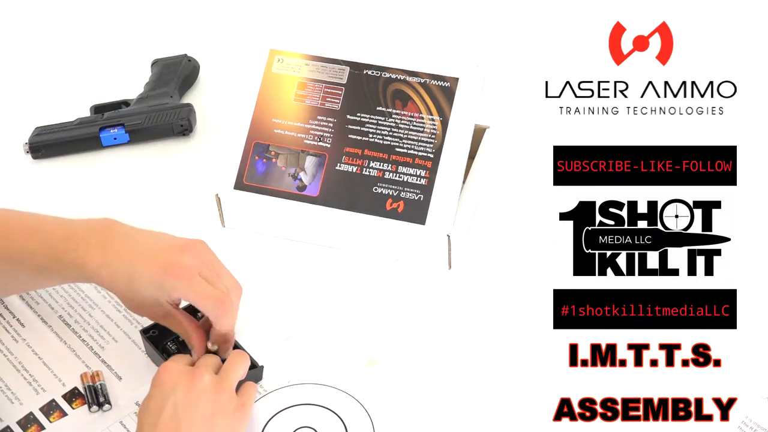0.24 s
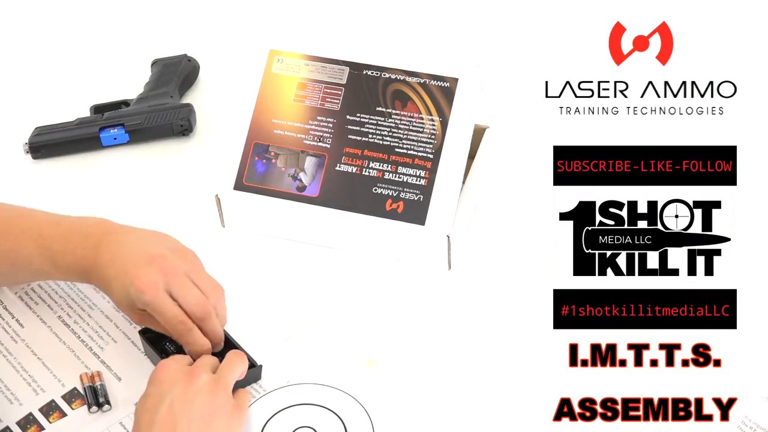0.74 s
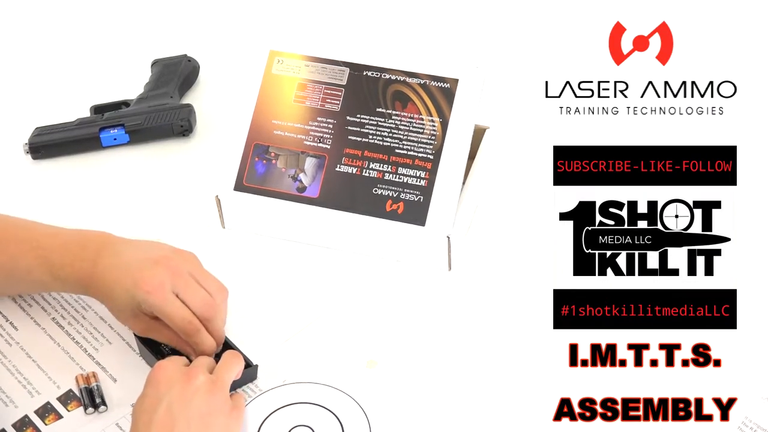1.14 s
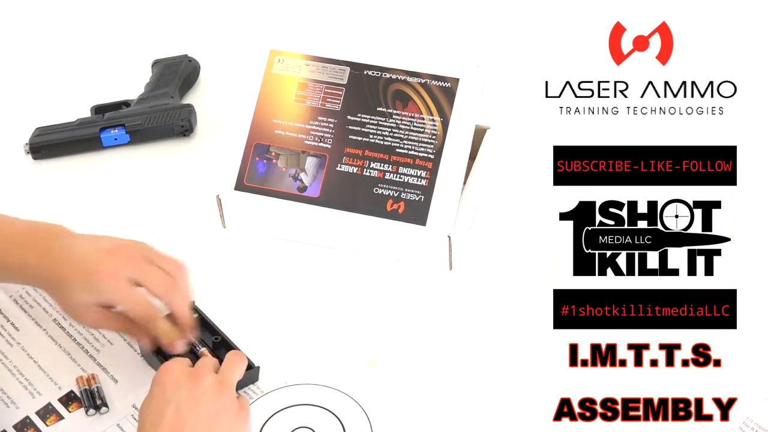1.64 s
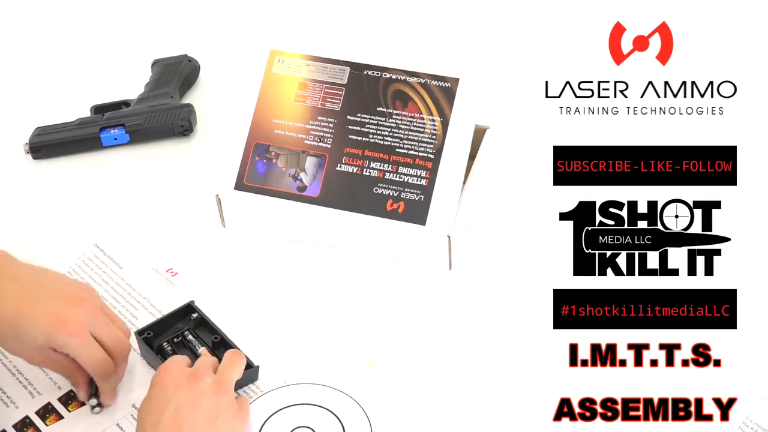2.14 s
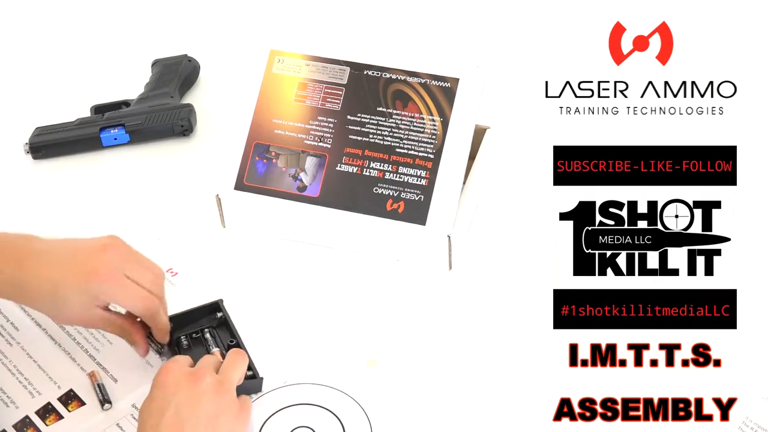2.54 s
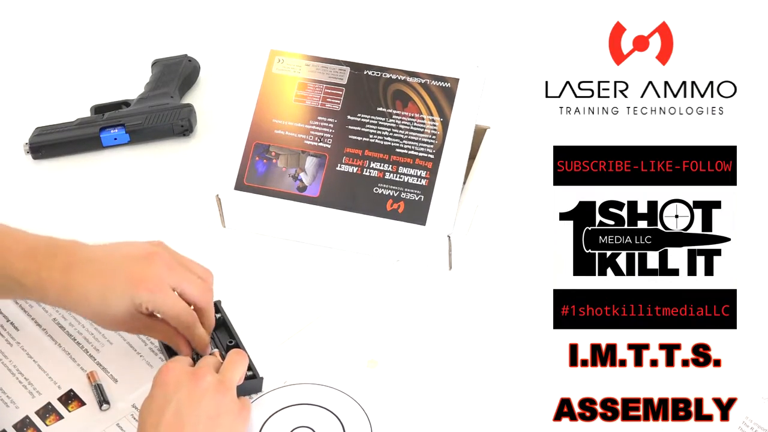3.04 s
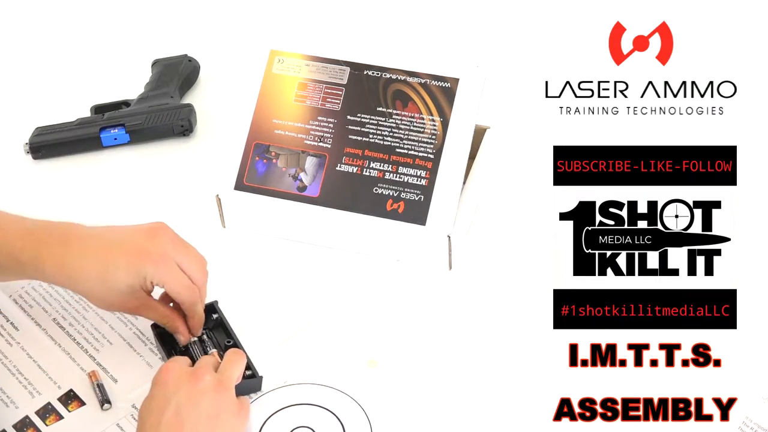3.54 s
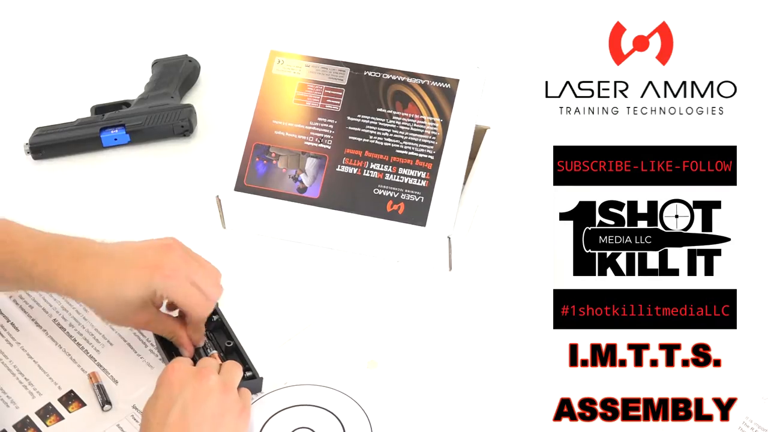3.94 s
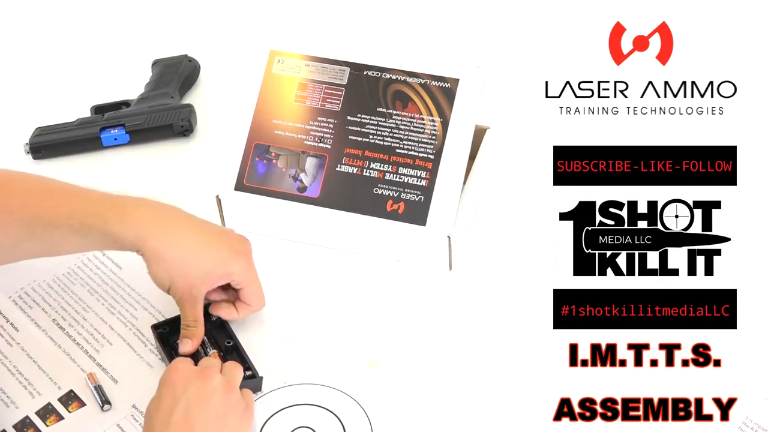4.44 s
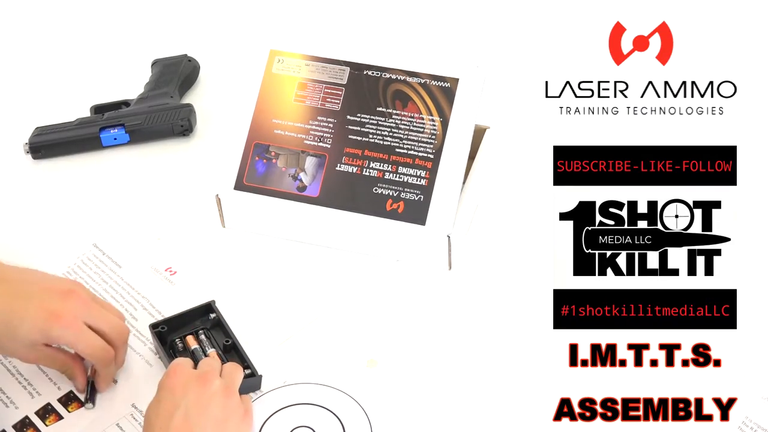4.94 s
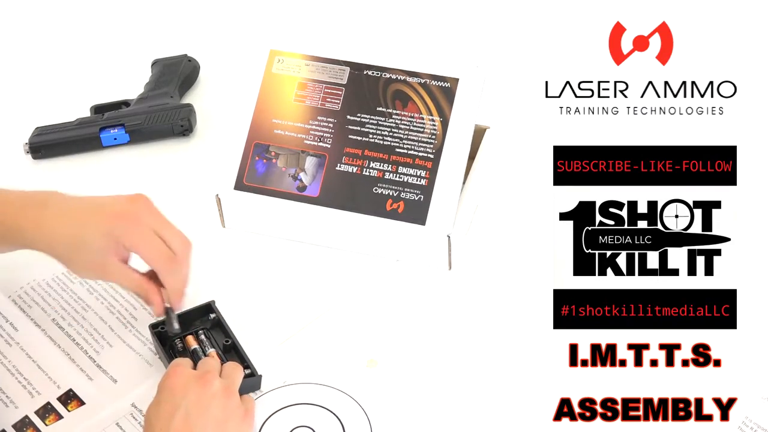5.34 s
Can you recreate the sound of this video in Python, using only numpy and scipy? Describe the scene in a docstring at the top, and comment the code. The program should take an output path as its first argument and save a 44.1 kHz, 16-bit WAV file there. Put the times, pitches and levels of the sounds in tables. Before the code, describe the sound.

Close irregular clicks and hollow plastic taps as battery cells are pressed home, with faint paper brushing, a spring ping and a lively room echo.

```python
"""A close stereo microphone in a bare, echoing room: hum and hiss (sines, coloured noise) run throughout.
From the start, small batteries knock and clack in a hollow plastic case on a table, and scrape along it.
A first cell snaps home at 0.7 s; dull thumps of the case follow, and cells brush and knock on paper.
Near 4 s two more cells snap in, a coil spring pings, and light ticks and brushes close the scene.
Short bursts ring decaying modes of each part, random catches make the slides, and noise tails the room."""
import sys
import numpy as np
from scipy import signal
from scipy.fft import rfft, irfft, next_fast_len
from scipy.io import wavfile

SR = 44100
rng = np.random.default_rng(int(sys.argv[2]) if len(sys.argv) > 2 else 0)


def store_wav(level_fs):
    """Save 16-bit WAV to argv[1]."""
    pcm = np.round(np.clip(np.atleast_2d(level_fs), -1, 1) * 32767)
    wavfile.write(sys.argv[1], SR, pcm.T.astype(np.int16))


N = 246417

# modes of the table, the hollow case and its walls: (frequency [Hz], relative strength [dB], t60 [s])
TABLE_MODES = [(53.3, 2.5, 0.016), (147.4, 0.5, 0.024), (218, -0.5, 0.027)]
CASE_MODES = [(218, -6, 0.015), (315.2, -1, 0.069), (441.7, -7, 0.041), (521, -8.5, 0.04)]
WALL_MODES = [(576.4, -0.5, 0.009), (641, -6, 0.065), (770, -7.5, 0.014), (1010, -1.5, 0.0097),
              (1490, 10, 0.00098)]


def from_db(db):
    """Decibels to gain."""
    return 10 ** (np.asarray(db) / 20)


def rms_one(x):
    """Scale to unit rms."""
    return x / np.sqrt(np.mean(x ** 2) + 1e-20)


def at_hz(points, hz):
    """Read a table on a log-frequency axis."""
    points = np.array(points)
    return np.interp(np.log(np.maximum(hz, 1)), np.log(points[:, 0]), points[:, 1])


def add(out, sound, s):
    """Mix a sound in at a time in seconds."""
    start = max(round(s * SR), 0)
    out[start:start + len(sound)] += sound[:max(N - start, 0)]


def coloured(x, spectrum):
    """Give a signal a smooth spectral shape."""
    size = x.shape[-1]
    gain = from_db(at_hz(spectrum, np.fft.rfftfreq(size, 1 / SR)))
    return irfft(rfft(x) * gain, size)


def stereo_noise(likeness, size):
    """White noise whose two channels are alike by a share that depends on frequency."""
    alike = np.clip(at_hz(likeness, np.fft.rfftfreq(size, 1 / SR)), -.99, .99)
    mid, side = rfft(rng.standard_normal((2, size)))
    shared = np.sqrt((1 + alike) / 2) * mid
    opposed = np.sqrt((1 - alike) / 2) * side * [[1], [-1]]
    return irfft(shared + opposed, size)


def background(hiss_db=-50):
    """Steady room rumble and hiss, shaped from noise, with a faint hum of sines."""
    # hum: (frequency [Hz], rms level [dB])
    hum_tones = [(79, -71.5), (480, -62.5)]
    # rumble and hiss: (frequency [Hz], relative density [dB per Hz])
    hiss_spectrum = [(15, -49), (25, -1), (80, -7.5), (145, -12), (270, -9.5), (301, -12.5), (405, -13),
                     (476, -16), (560, -13), (818, -14.5), (1370, -19), (1650, -18), (2110, -17),
                     (2550, -22), (16000, -30)]
    # left-right likeness of the hiss: (frequency [Hz], share [-1 to 1])
    hiss_likeness = [(50, 0.61), (200, 0.057), (1400, 0.18), (4000, 0.084), (15000, 0.026)]
    t = np.arange(N) / SR
    hum = 0
    for hz, db in hum_tones:
        hum = hum + np.sqrt(2) * from_db(db) * np.sin(2 * np.pi * (hz * t + rng.random()))
    hiss = rms_one(coloured(stereo_noise(hiss_likeness, N), hiss_spectrum))
    return hum + from_db(hiss_db) * hiss


def ring(force, modes, scatter_db=2.43):
    """A force rings the modes of a part, alternating in sign, each strength scattered by place of contact."""
    out = 0
    for k, (hz, db, t60) in enumerate(modes):
        radius = from_db(-60 / (t60 * SR))
        angle = 2 * np.pi * hz / SR
        resonator = [1, -2 * radius * np.cos(angle), radius * radius]
        mode = signal.lfilter([1, 0, -1], resonator, force + 1e-18)
        out = out + (-1) ** k * from_db(db + scatter_db * rng.standard_normal()) * mode
    return out


def blow(modes, grind_s, push, low_hz, soft_hz):
    """A push and a burst of micro-impacts ring a part; unit level over the first eightieth of a second."""
    t = np.arange(SR // 10) / SR
    lead, first = SR // 3000, SR // 80
    grinding = rng.standard_normal(len(t)) * np.exp(-t / grind_s)
    burst = np.roll(push * (t == 0) + grinding, lead)
    for _ in range(4):
        # make the burst even across frequency, then confine it in time again
        spectrum = rfft(burst)
        burst = irfft(spectrum / np.abs(spectrum), len(t)) * np.exp(-(t / (7 * grind_s)) ** 2)
    band = signal.butter(2, [low_hz, min(soft_hz, SR / 2 - 1)], "band", fs=SR, output="sos")
    sound = ring(signal.sosfilt(band, burst), modes)
    return sound / np.std(sound[:first])


def contacts():
    """Every contact is felt by all parts: its kind sets their shares, its hardness tilts them."""
    # modes of the latch, metal can and coil spring: (frequency [Hz], relative strength [dB], t60 [s])
    latch_modes = [(1603, -2.5, 0.015), (1970, 4, 0.0077), (2495, 9, 0.0025), (3460, -7.5, 0.0034),
                   (4500, -8.5, 0.003)]
    can_modes = [(3800, 5, 0.002), (4030, -0.5, 0.0024), (5070, -3, 0.0029), (5860, -4.5, 0.0054),
                 (6240, 0, 0.0018)]
    spring_modes = [(7730, 12.6, 0.0037), (9200, 14, 0.0026), (10700, 15.6, 0.002), (14200, 4.5, 0.0019)]
    # one row each for latch, table, case, wall, can, spring: (grinding decay [s],
    # clean push against one grain of grinding [ratio], lowest radiated [Hz], softness cut-off [Hz])
    couplings = [(0.0046, 0.093, 2500, 6000), (0.0002, 33, 18, 300), (0.00082, 5.1, 265, 720),
                 (0.0004, 1.85, 410, 1400), (0.0037, 1.3, 2550, 7500), (0.00079, 0.79, 5600, 19000)]
    # tilt of latch, table, case, wall, can, spring: [dB per dB of hardness]
    hardness_slopes = (0.86, -0.67, 0.32, -0.25, 1, 0.28)

    # events below: (time [s], strength before sharing [dB], hardness [dB])
    # a cell is set down on the floor of the hollow case
    knocks = [(0.1311, -31.5, -1), (0.2371, -37, -8), (0.3589, -37.5, 0), (1.4118, -40.5, -1),
              (1.4262, -38, 3), (3.0895, -29.5, 4.5), (3.4403, -40, 2)]
    # a cell is jostled against a side wall
    clacks = [(0.376, -35.5, 4), (0.3855, -36, -4), (0.3938, -34.5, -3), (0.4222, -27, 1.5),
              (0.4304, -36.5, 7), (0.5731, -34, -4), (0.7625, -43, -14), (0.8634, -36.5, 2),
              (2.6904, -48.5, 7), (3.1267, -33.5, 4), (3.5095, -33.5, -0.5), (3.5148, -33, 7.5),
              (4.2487, -33.5, 3.5)]
    # a cell's metal can grazes an edge
    ticks = [(0.6005, -47, 2), (0.7535, -41, -10), (1.5224, -43, -4), (2.5333, -36, -1), (2.5714, -54, -7),
             (2.7635, -44, 5), (4.9466, -42.5, 3.5), (5.026, -43.5, -2)]
    # a cell snaps home in two blows, one for each end
    snaps = [(0.7254, -25, 4), (0.7326, -33, 1.5), (3.854, -25, -1), (3.8622, -34.5, -6.5),
             (4.2855, -25.5, -5), (4.2995, -34.5, 9)]
    # a dull thump of the case on the table, from a finger or under a heavy knock
    thumps = [(1.1565, -38, 6.5), (1.2866, -35.5, -1.5), (1.4433, -35.5, 4.5), (3.0905, -40, 4.5),
              (4.0674, -30.5, 1), (4.2381, -33.5, -6.5)]
    # the coil spring slips and flicks the seated cell
    pings = [(4.289, -31, -12), (4.5279, -25, 0.5)]

    # shares of each kind: (latch [dB], table [dB], case [dB], wall [dB], can [dB], spring [dB])
    knock_shares = (-14, -21, 1.5, -4, -20, -21)
    clack_shares = (-8, -12, -3.5, 1.5, -12.5, -26)
    tick_shares = (0, -8, -10.5, -4.5, -0.5, -13.5)
    snap_shares = (-1.5, 0, 2, 2, -5, -21.5)
    thump_shares = (-25, 0.5, -12, -11.5, -14, -23)
    ping_shares = (-36, -65, -16, -25, -2.5, -3)

    parts = (latch_modes, TABLE_MODES, CASE_MODES, WALL_MODES, can_modes, spring_modes)
    kinds = ((knocks, knock_shares), (clacks, clack_shares), (ticks, tick_shares),
             (snaps, snap_shares), (thumps, thump_shares), (pings, ping_shares))
    out = np.zeros(N)
    for events, shares in kinds:
        for s, strength_db, hardness_db in events:
            for modes, share_db, slope, coupling in zip(parts, shares, hardness_slopes, couplings):
                level_db = strength_db + share_db + slope * hardness_db
                add(out, from_db(level_db) * blow(modes, *coupling), s)
    return out


def slides(catches_per_s=1800, wall_db=-10.0):
    """A sliding cell catches on many tiny ridges: bright grit, and a rumble in the case and walls."""
    # a cell is pushed along inside the case: (start [s], length [s], grit level [dB])
    scrapes = [(0.374, 0.039, -40), (0.537, 0.1, -53.5), (1.417, 0.11, -50), (3.648, 0.04, -48.5),
               (4.216, 0.095, -48.5)]
    # a loose cell brushes lightly over paper or the rim: (start [s], length [s], grit level [dB])
    brushes = [(1.616, 0.11, -57), (2.038, 0.054, -51), (2.112, 0.11, -49), (2.237, 0.022, -41.5),
               (2.538, 0.12, -42.5), (2.971, 0.029, -47.5), (3.277, 0.019, -44.5), (4.926, 0.15, -48.5),
               (5.077, 0.072, -49.5)]
    # colour of the grit: (frequency [Hz], relative density [dB per Hz])
    grit_spectrum = [(700, 0.5), (1500, -1.5), (2500, -2.5), (4000, 4), (6200, -2.5), (8000, -5.5),
                     (12000, -14), (16000, -25)]
    out = np.zeros(N)
    t = np.arange(SR // 3) / SR
    # rumble over grit [dB]: pressure couples the cell to the case
    for strokes, rumble_db in ((scrapes, 9.5), (brushes, -8)):
        for s, length, grit_db in strokes:
            pressure = np.sqrt(np.abs(np.sin(np.pi * np.minimum(t / length, 1))))
            signs = rng.choice([-1, 1], len(t))
            force = pressure * signs * (rng.random(len(t)) < catches_per_s / SR)
            case = rms_one(ring(force, CASE_MODES))
            wall = rms_one(ring(force, WALL_MODES))
            rumble = case + from_db(wall_db) * wall
            grit = rms_one(coloured(force, grit_spectrum))
            # refer the level to the stroke, not to the whole third of a second
            stroke_gain = np.sqrt(length / t[-1]) * from_db(grit_db)
            add(out, stroke_gain * (from_db(rumble_db) * rumble + grit), s)
    return out


def bumps():
    """The soft heel of the hand stirs only the deepest ring of the table."""
    # the hand bumps the table top: (time [s], level [dB])
    hand_bumps = [(0.573, -45), (1.16, -47), (1.286, -41), (1.459, -46)]
    out = np.zeros(N)
    for s, db in hand_bumps:
        add(out, from_db(db) * blow(TABLE_MODES, grind_s=0.0016, push=5.6, low_hz=42.5, soft_hz=101), s)
    return out


def fumbles():
    """Paper cushions the knocks of the cell that is being picked up."""
    # a loose cell knocks on the paper-covered desk: (time [s], level [dB])
    desk_knocks = [(2.077, -43.5), (2.201, -32), (2.211, -35), (2.693, -48)]
    # modes of the desk: (frequency [Hz], relative strength [dB], t60 [s])
    desk_modes = [(216, 1.5, 0.052), (325, 1.5, 0.085), (397, 6.5, 0.031), (535, 2.5, 0.057),
                  (850, -5, 0.012), (2600, 6, 0.0015)]
    out = np.zeros(N)
    for s, db in desk_knocks:
        add(out, from_db(db) * blow(desk_modes, grind_s=0.0016, push=4.3, low_hz=110, soft_hz=4000), s)
    return out


def handling():
    """Everything the hands set ringing, freshly drawn at each call."""
    return contacts() + slides() + bumps() + fumbles()


def near_sound(x, port_lag_s=6e-5):
    """The direct sound and its first echoes reach the left port slightly before the right."""
    # near surfaces: (delay [s], level [dB])
    echoes = [(.0069, -10.5), (0.027, -11.5)]
    # balance of the ports: (frequency [Hz], left over right [dB])
    balance = [(60, 4), (300, 1), (1000, 0.3), (2500, 0.75), (5000, 0), (9000, -5), (15000, 3)]
    near = x.copy()
    for delay_s, db in echoes:
        add(near, from_db(db) * x, delay_s)
    size = next_fast_len(N)
    hz = np.fft.rfftfreq(size, 1 / SR)
    lean = from_db(at_hz(balance, hz) / 2)
    ports = np.array([lean, np.exp(-2j * np.pi * hz * port_lag_s) / lean])
    return irfft(rfft(near, size) * ports, size)[:, :N]


def room_tail(x, build_s=0.004):
    """Diffuse reverberation swells briefly, then dies at a rate of its own in each band."""
    # decay of the room: (frequency [Hz], t60 [s])
    decay_times = [(80, 1.26), (300, 0.74), (700, 1.28), (2500, 1.1), (5000, 1.12), (10000, 0.53),
                   (16000, 0.65)]
    # tail against the direct sound: (frequency [Hz], level [dB])
    tail_levels = [(60, -15.5), (150, -2), (310, -5.5), (450, -2.5), (650, -5), (1300, 2), (2700, -3.5),
                   (5000, -5.5), (10000, -6), (14000, -5)]
    # left-right likeness of the tail: (frequency [Hz], share [-1 to 1])
    tail_likeness = [(60, 0.77), (300, 0.67), (1400, 0.65), (3100, 0.6), (7000, 0.15), (15000, 0.22)]
    t = np.arange(3 * SR // 2) / SR
    hz = np.fft.rfftfreq(len(t), 1 / SR)
    noise = rfft(stereo_noise(tail_likeness, len(t)))
    edges = np.geomspace(30, 18000, 19)
    response = 0
    for low, high in zip(edges, edges[1:]):
        decay = from_db(-60 * t / at_hz(decay_times, np.sqrt(low * high)))
        envelope = decay * (1 - np.exp(-(t / build_s) ** 2))
        in_band = (hz >= low) * (hz < high)
        band = irfft(noise * in_band * from_db(at_hz(tail_levels, hz)), len(t))
        response = response + band * envelope / np.linalg.norm(envelope)
    return signal.fftconvolve(x[None], response, axes=1)[:, :N]


def scene():
    """Two independent draws of the handling feed the room, which smooths the tail; the first is heard directly."""
    direct, second = handling(), handling()
    room = (room_tail(direct) + room_tail(second)) / np.sqrt(2)
    return near_sound(direct) + room + background()


def record(dry):
    """The top is cut steeply above 16.2 kHz, filtered forwards and backwards."""
    low_pass = signal.ellip(10, .05, 60, 16200, fs=SR, output="sos")
    return signal.sosfiltfilt(low_pass, dry)


dry = scene()
out = record(dry)
store_wav(out)
```